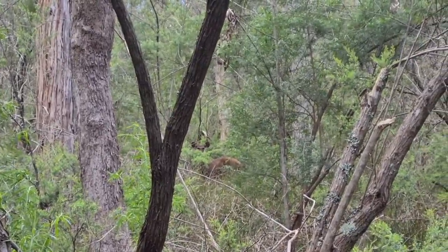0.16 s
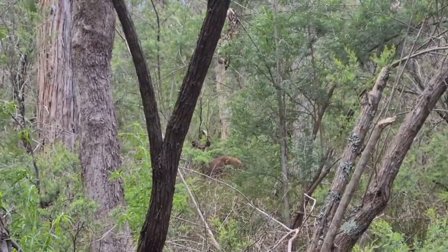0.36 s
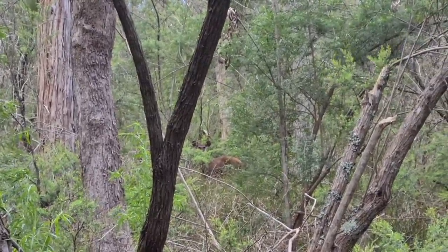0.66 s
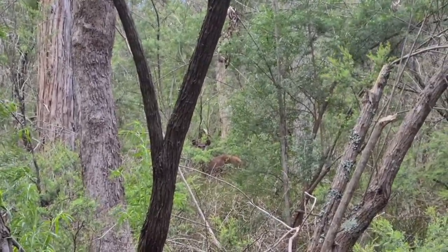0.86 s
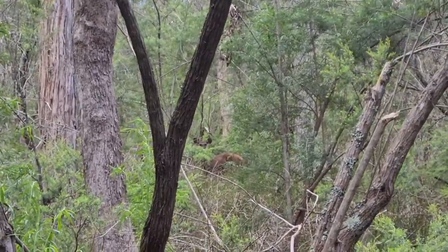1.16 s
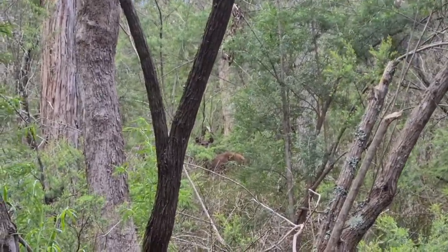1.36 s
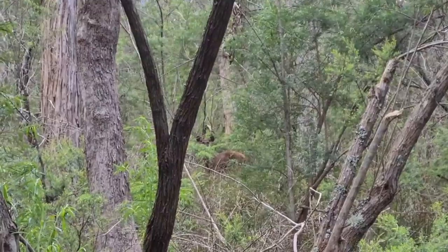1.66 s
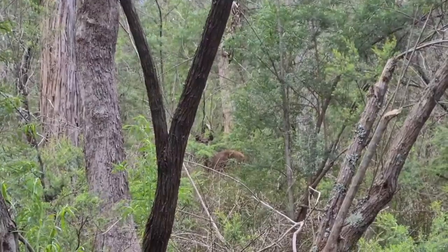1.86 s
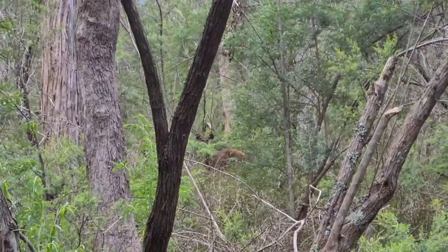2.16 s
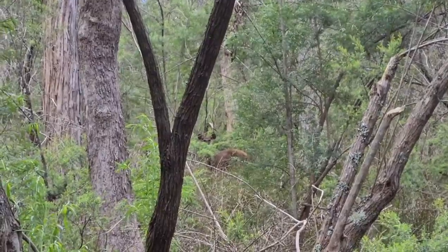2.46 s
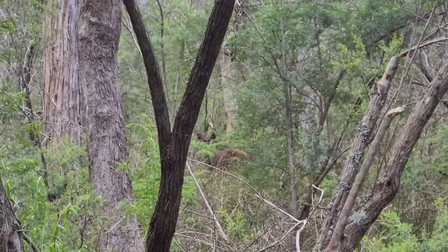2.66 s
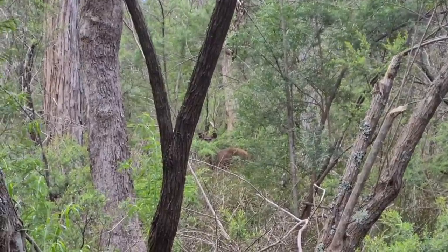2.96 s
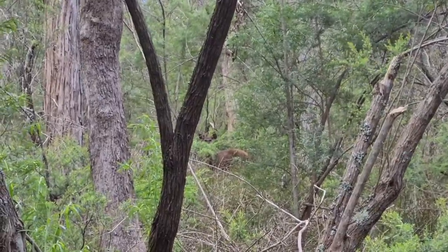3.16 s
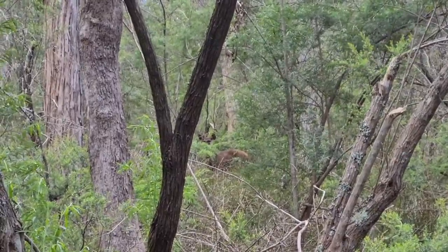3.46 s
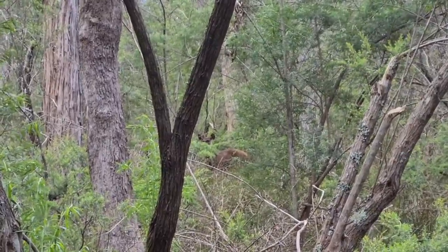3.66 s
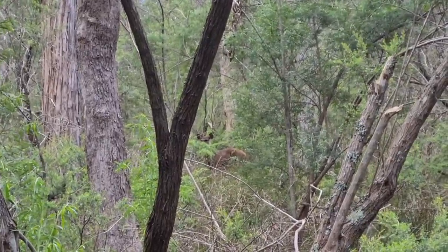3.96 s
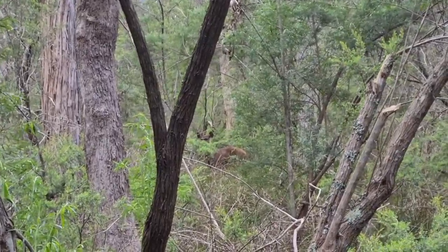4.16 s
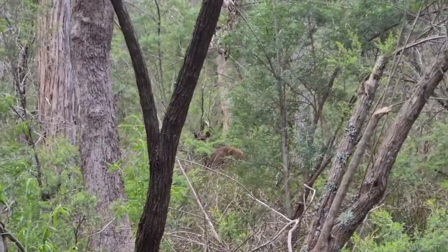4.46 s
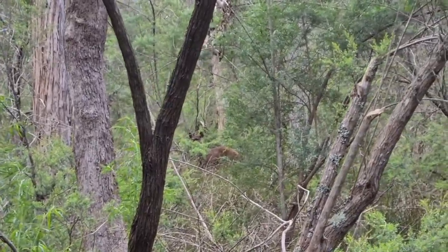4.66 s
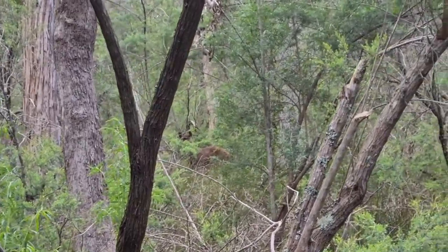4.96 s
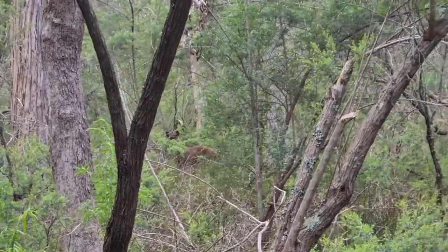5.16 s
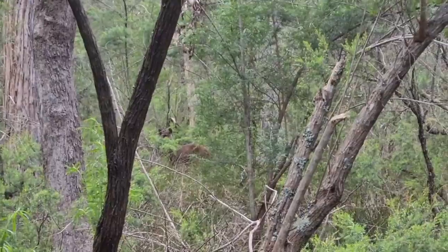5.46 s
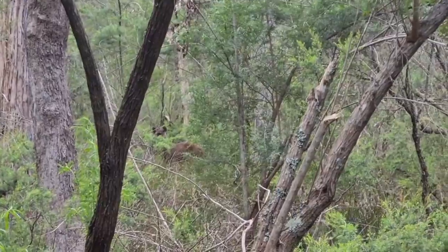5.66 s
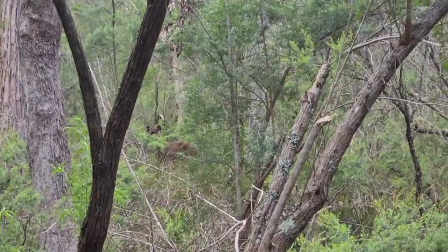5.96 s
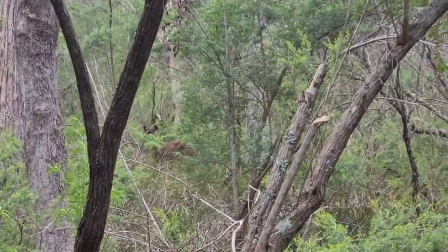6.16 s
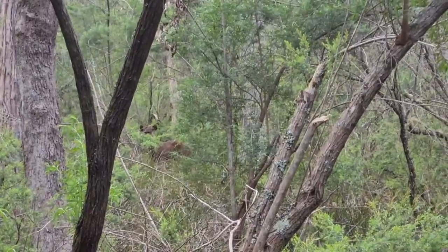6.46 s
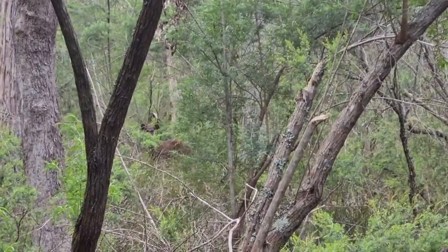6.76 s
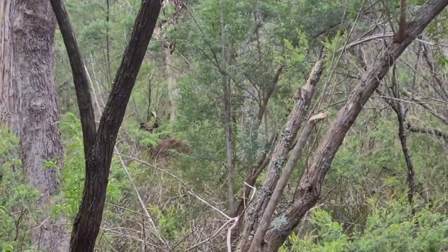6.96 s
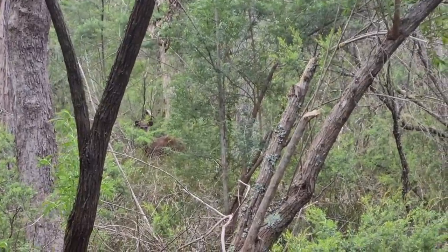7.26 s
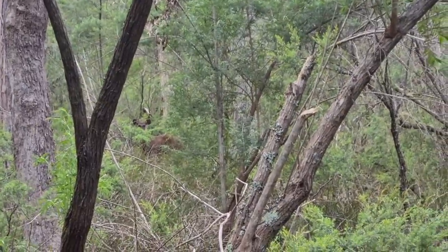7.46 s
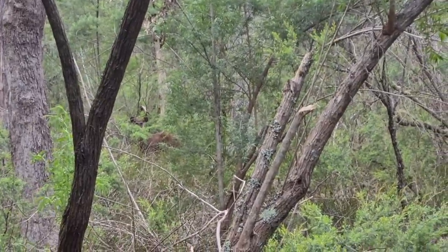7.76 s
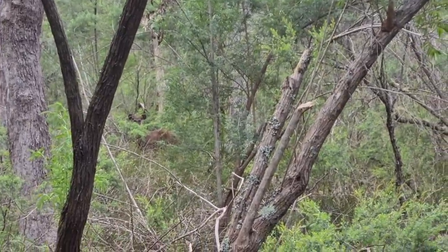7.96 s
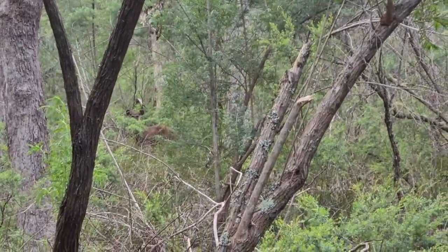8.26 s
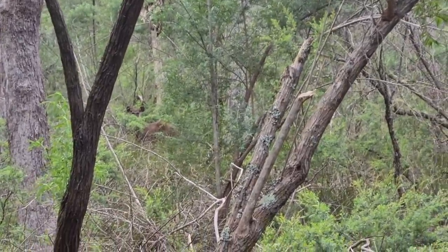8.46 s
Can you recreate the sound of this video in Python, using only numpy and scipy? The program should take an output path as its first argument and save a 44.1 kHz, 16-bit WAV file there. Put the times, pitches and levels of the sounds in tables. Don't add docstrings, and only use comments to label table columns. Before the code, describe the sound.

A near deer calls three times from the right: one bright, slightly raspy bleat early, then a cleaner one and a higher, longer one near the end. Each starts with a tiny leak of air, rises briefly and slides down. Between them a small bird twitters on the left, its notes scattered by trunks. Gentle wind and faint far birds surround them, caught by a stereo camera whose gain sinks and slowly recovers.

```python
import sys
import numpy as np
from scipy import signal
from scipy.fft import rfft, irfft, next_fast_len
from scipy.io import wavfile
from scipy.ndimage import uniform_filter1d, map_coordinates

SR = 44100
rng = np.random.default_rng(int(sys.argv[2]) if len(sys.argv) > 2 else 0)


def put_to_file(sound):
    columns = np.atleast_2d(sound).T
    safe = np.clip(columns, -1, 1)
    whole_steps = np.round(safe * 32767)
    wavfile.write(sys.argv[1], SR, whole_steps.astype(np.int16))


def volts(x):
    e = np.asarray(x, float) / 20
    return 10 ** e


N = 380141

# time_s, level_db
WIND_DB = [(0, -57), (.5, -57), (1.5, -58.5), (2.8, -58.5), (3.6, -56.5), (4.001, -57.5), (4.47, -55),
           (5.1, -57), (5.599, -56.5), (6.5, -57), (8.62, -58)]
# freq_hz, level_db_per_hz
RUMBLE_SPECTRUM = [(12, -42), (20, -16), (59, 8), (151, -3.5), (200, -10), (260, -34), (440, -120)]
CANOPY_SPECTRUM = [(90, -31.5), (130, -7.5), (430, -5), (650, -5.5), (900, -9), (1400, -8.5), (2400, -17),
                   (4000, -22.5), (6000, -43)]
LEAF_SPECTRUM = [(1500, -28), (3000, 0.5), (4400, -4), (6500, -2.5), (7300, -7), (9000, -16), (12000, -12),
                 (16000, -16.5)]
# freq_hz, correlation
LIKENESS = [(60, 0.53), (130, 0.86), (290, 0.96), (640, 0.37), (1410, -0.36), (3100, 0.7), (6820, -0.043),
            (15000, -0.01)]
# center_s, spread_s, level_db
GUSTS = [
    (0.1, .5, -60),
    (4.45, .2, -65),
    (5.6, 0.46, -55.5),
]

# start_s,
# length_s, middle_hz, peak_db
FAR_SLIDES = [(0.091, 0.027, 3090, -56), (0.278, 0.025, 3130, -56.5), (.48, 0.019, 3210, -59.5),
              (.67, .03, 2950, -60.5), (2.58, 0.015, 4110, -64), (3.068, 0.03, 3450, -57.5),
              (4.815, .018, 4400, -63), (4.949, .015, 4420, -60.5), (5.069, 0.02, 4140, -54.5),
              (5.265, 0.03, 2820, -51), (5.72, .04, 2430, -59)]
FAR_PIPS = [(.14, 0.011, 2550, -55), (.335, .018, 2520, -59.5), (0.356, .015, 5150, -65),
            (2.975, .02, 3780, -60), (2.99, .014, 4250, -65), (5.709, .03, 2200, -62),
            (5.935, 0.077, 3536, -59.5), (6.035, .04, 4450, -67.5)]
FAR_RISES = [(.975, 0.024, 6270, -61.5), (3.22, 0.018, 3270, -63), (5.869, 0.041, 2500, -56.5),
             (6.07, .02, 1950, -62.5)]
FAR_SWEEPS = [(2.525, .024, 3285, -66), (2.64, .03, 3160, -61.5), (2.78, 0.024, 3200, -59),
              (2.93, 0.031, 3000, -58), (3.27, 0.028, 3070, -58), (5.095, 0.05, 2970, -51),
              (5.41, 0.016, 2770, -50), (5.55, 0.026, 2550, -51.5), (5.69, 0.03, 2980, -53),
              (6.04, .03, 2250, -57.5)]
FAR_CROOKS = [(5.249, 0.036, 3000, -52), (5.385, 0.029, 3755, -53.5), (5.67, .03, 3650, -55),
              (5.71, 0.033, 3610, -57), (5.895, 0.036, 2800, -51), (6.015, 0.027, 2964, -49),
              (6.045, 0.024, 2950, -61.5), (6.085, 0.029, 2230, -58.5)]

# catch_s, lead_hz, lead_db, leak_db, rasp_db_per_octave
ONSETS = [
    (1.0745, 1083, -34.5, -46, 2),
    (6.2585, 1132, -36.5, -47.5, 0),
    (7.3579, 1392, -48.5, -52.5, -1),
]
# time_from_catch_s, level_db
AIR_LEAK = [
    (-.135, -27.5),
    (-.095, -24.5),
    (-.085, -9.5),
    (-.01, 2.5),
]
# time_s, pitch_hz
PITCH_HZ = [
    [(1.083, 1326), (1.132, 1413), (1.2, 1646), (1.242, 1673), (1.32, 1492), (1.465, 1382), (1.548, 1147),
     (1.6, 1036), (1.74, 582)],
    [(6.266, 1384), (6.314, 1457), (6.374, 1657), (6.42, 1664), (6.535, 1430), (6.63, 1366), (6.705, 1185),
     (6.754, 895), (6.845, 566)],
    [(7.365, 1594), (7.4, 1603), (7.49, 1729), (7.578, 1714), (7.722, 1537), (7.785, 1496), (7.968, 1114),
     (8.084, 778.6), (8.125, 597)],
]
# time_s, level_db
EFFORT_DB = [
    [(1.077, -11), (1.113, -9.5), (1.229, -17), (1.301, -13.5), (1.327, -15.5), (1.447, -11), (1.647, -17),
     (1.695, -29.5), (1.785, -63)],
    [(6.263, -10.5), (6.329, -9.5), (6.373, -13), (6.44, -12.5), (6.505, -10.5), (6.683, -22.5),
     (6.757, -19.5), (6.799, -23), (6.89, -60.5)],
    [(7.361, -14), (7.381, -12), (7.781, -11), (7.871, -19.5), (7.92, -20), (7.983, -23), (7.999, -17),
     (8.091, -27), (8.165, -65)],
]
# harmonic_number, level_db
FOLDS_DB = [(1, -7), (2, 0.64), (3, -8), (4, -8), (5, -12.5), (6, -13.5), (7, -14), (8, -24.5), (9, -13),
            (10, -18), (12, -18), (14, -28.5), (30, -23)]
# freq_hz, gain_db
THROAT_DB = [(550, -47.5), (800, -25), (1200, -16), (1650, -11), (2250, -12), (2600, -5.5), (2950, 0.8),
             (3300, -3), (4050, -12), (4900, -9), (7000, -11.5), (8900, -26), (11000, -12.5), (15500, -8.5)]
# freq_hz, level_db_per_hz
BREATH_SPECTRUM = [(200, -17.5), (400, -15), (800, -10), (1200, -9.5), (2000, -11.5), (3000, -1.5),
                   (4500, -12.5), (7000, -5), (8800, -20), (12000, -11), (15500, -4)]
# center_s, spread_s, level_db
PUFFS = [
    (1.74, .04, -51),
    (6.82, .04, -46),
    (8.11, 0.055, -53.5),
]
# freq_hz, gain_db
FAR_EAR_DB = [(60, 1.5), (110, 0.5), (200, -1.0), (380, -2.0), (700, -4.0), (1290, -10.5), (2380, -13.5),
              (4400, -10), (8120, -11.5), (15000, -17.5)]
# delay_ms, left_db, right_db
NEAR_ECHOES = [(1.05, -21, -16), (1.9, -17, -18), (3.3, -16.5, -23), (6.1, -18.5, -21.5)]

# start_s, length_s, middle_hz, peak_db
NEAR_ARCHES = [(2.726, 0.017, 5870, -51), (3.076, .018, 7270, -53), (3.076, 0.034, 6120, -45),
               (3.292, 0.025, 5650, -39), (3.431, 0.02, 7170, -48.5), (3.431, 0.026, 5920, -42),
               (3.786, 0.032, 5990, -40.5), (4.015, 0.032, 5670, -39), (4.169, 0.035, 6020, -42),
               (4.252, 0.027, 5730, -38), (4.256, 0.027, 7100, -51.5)]
NEAR_HOOKS = [(2.822, 0.023, 5000, -44.5), (3.153, 0.018, 5770, -26), (3.356, 0.018, 5195, -27.5),
              (3.508, 0.016, 5910, -29.5), (3.715, 0.013, 5110, -27.5), (3.875, 0.02, 6040, -27.5),
              (4.08, 0.019, 4970, -28)]
NEAR_HOLDS = [(2.871, 0.033, 5920, -39.5), (3.21, 0.023, 6460, -38), (3.563, .01, 7690, -52),
              (4.118, 0.022, 6680, -41.5), (4.324, 0.13, 6520, -38.5), (4.47, 0.093, 5092, -30.5)]
NEAR_DROOPS = [(3.09, 0.026, 4550, -56), (3.445, .028, 4270, -56.5), (3.806, .03, 4400, -57),
               (4.185, 0.029, 4420, -53)]
NEAR_FALLS = [(3.193, 0.028, 6830, -38.5), (3.379, .014, 5570, -31), (3.623, 0.016, 5610, -26.5),
              (3.658, 0.01, 6930, -36), (3.744, 0.0139, 5660, -30.5), (3.928, .03, 6740, -36)]

HOOK, FALL, HOLD, ARCH, DROOP = (1.045, 1.015), (1.03, .982), (1.011, .996), (.925, .97), (1.0, .92)
SWEEP, SLIDE, RISE = (1.22, .72), (1.06, .86), (.85, 1.15)
OVERTONE_DB = -39

DUCK_DB, DUCK_S, RECOVER_S = -7.5, .15, 1.3
RUMBLE_DB, RUMBLE_GROWTH, LULL_DB = -6, 1, 0.5
HISS_DB, TOP_HZ = -83.5, 15900

LEAD_S, LEAD_RISE_RATIO, JUMP_S = .028, 0.045, .003
SAG_HZ_PER_S, WAVER_RATIO_PER_OCT = 510, .006
BRIGHT_DB, FIRST_DB = 0, -0.5
BLOOM_DB, BLOOM_S = -8, 0.088
ECHO_S, ECHO_DB = .14, -35
HOP_S, LAG_BEFORE_SAMPLES, LAG_AFTER_SAMPLES = 4.31, 20.86, 18.8


def along(points, hz):
    f, v = np.transpose(points)
    return np.interp(np.log(hz + 1), np.log(f + 1), v)


def unit(x):
    return x / np.sqrt(np.mean(x ** 2) + 1e-20)


def filtered(x, response):
    m = next_fast_len(N + 8192)
    return irfft(rfft(x, m) * response(np.fft.rfftfreq(m, 1 / SR)), m)[..., :N]


def colored(spectrum):
    return unit(filtered(rng.standard_normal(N), lambda hz: volts(along(spectrum, hz))))


def wobble(rate_hz, count):
    knots = rng.standard_normal(int(N * 300 / SR) + 4)
    return map_coordinates(knots, [np.arange(count) * rate_hz / SR])


def swells(table):
    t = np.arange(N) / SR
    return sum(volts(db) * np.exp(-((t - at) / spread) ** 2) for at, spread, db in table)


def ports(x, lag, left_db):
    left = filtered(x, lambda hz: volts(left_db(hz)) * np.exp(-2j * np.pi * hz * lag / SR))
    return np.array([left, x])


def trunks(x, t60_s, wet_db):
    t = np.arange(SR) / SR
    tail = rng.standard_normal((2, SR)) * volts(-60 * t / t60_s) * (1 - np.exp(-t / (0.11 * t60_s)))
    tail = tail / np.linalg.norm(tail[0])
    return volts(wet_db) * signal.fftconvolve(x[None], tail, axes=1)[:, :N]


def ducking():
    t = np.arange(N) / SR
    dips = []
    for effort in EFFORT_DB:
        sink = 1 - np.exp(-np.maximum(t - effort[0][0], 0) / DUCK_S)
        recover = np.exp(-np.maximum(t - effort[-1][0], 0) / RECOVER_S)
        dips.append(sink * recover)
    return DUCK_DB * np.max(dips, axis=0)


def rush(spectrum, alike, patchy_db):
    z = signal.stft(rng.standard_normal((2, N)), nperseg=512)[2]
    field = uniform_filter1d(rng.standard_normal(z.shape[1:]), size=6, axis=0)
    field = uniform_filter1d(field, size=14, axis=1)
    pair = signal.istft(z * volts(patchy_db * unit(field)), nperseg=512)[1][:, :N]

    def mid_side(hz):
        turn = np.arccos(np.clip(along(alike, hz), -1, 1)) / 2
        return volts(along(spectrum, hz)) * np.array([np.cos(turn), np.sin(turn)])

    mid, side = filtered(pair, mid_side)
    return unit(np.array([mid + side, mid - side]))


def bush():
    wind_db = np.interp(np.arange(N) / SR, *np.transpose(WIND_DB))
    canopy_db = wind_db + ducking()
    rumble_db = canopy_db + RUMBLE_DB + (RUMBLE_GROWTH - 1) * (wind_db - wind_db.mean())
    rumble_db = rumble_db + LULL_DB * wobble(2.5, N) + 4.0 + 1.5 * wobble(6, N)
    rumble = volts(rumble_db) * rush(RUMBLE_SPECTRUM, [(30, .35), (80, .45), (150, 0.49)], patchy_db=0.5)
    canopy = volts(canopy_db + 4.0 + .6 * wobble(5, N)) * rush(CANOPY_SPECTRUM, LIKENESS, patchy_db=1.15)
    leaves = volts(canopy_db - 6.0) * rush(LEAF_SPECTRUM, LIKENESS, patchy_db=1.36)
    gust_spectrum = [(800, -34), (1100, -4), (1350, 1.65), (1700, -10), (2300, -36.5)]
    gusts = swells(GUSTS) * rush(gust_spectrum, LIKENESS, patchy_db=0.5)
    return rumble + canopy + leaves + gusts


def whistles(table, shape):
    out = np.zeros(N)
    for start_s, length_s, hz, db in table:
        u = np.linspace(0, 1, round(1.45 * length_s * SR))
        curve = np.polyfit([.15, .5, .85], [shape[0], 1, shape[1]], 2)
        phase = 2 * np.pi * np.cumsum(hz * np.polyval(curve, u)) / SR
        swell = np.sin(np.pi * u ** (.95 - 2.5 * length_s)) ** 1.2
        tone = np.sin(phase) + volts(OVERTONE_DB) * np.sin(3 * phase)
        out[round((start_s - .12 * length_s) * SR):][:len(u)] += volts(db) * swell * tone
    return out


def far_birds():
    song = whistles(FAR_SLIDES, SLIDE) + whistles(FAR_PIPS, HOLD) + whistles(FAR_RISES, RISE)
    song = song + whistles(FAR_SWEEPS, SWEEP) + whistles(FAR_CROOKS, ARCH)
    song = volts(8.0) * song
    return ports(song, lag=9.4, left_db=lambda hz: -5.5) + trunks(song, .6, -7) + trunks(song, .09, -5)


def fold_pitch(t, pitch, catch_s, lead_hz):
    aim = np.interp(t, *np.transpose(pitch)) - SAG_HZ_PER_S * np.maximum(t - pitch[-1][0], 0)
    flutter = 0.00061 * wobble(70, len(t)) * (1700 / aim)
    waver = WAVER_RATIO_PER_OCT * wobble(28, len(t)) * np.log2(1750 / aim)
    voiced_hz = uniform_filter1d(aim, size=1100, mode="nearest") * (1 + flutter + waver)
    jump = 1 / (1 + np.exp((catch_s - .8 * JUMP_S - t) / JUMP_S))
    return jump * voiced_hz + (1 - jump) * lead_hz * (1 + LEAD_RISE_RATIO * (t - t[0]) / LEAD_S)


def fold_tone(t, hz, effort_db, catch_s, caught, rasp_db):
    k = np.arange(1, 30)[:, None]
    fall_oct = np.log2(1700 / hz)
    tilt_db = (k == 1) * FIRST_DB + np.log2(np.maximum(k / 2, 1)) * (BRIGHT_DB + 0.75 * rasp_db)
    bloom = np.exp(-np.maximum(t - catch_s, 0) / BLOOM_S)
    shape_db = along(FOLDS_DB, k) + along(THROAT_DB, k * hz) + tilt_db * (fall_oct - .4)
    shape_db = shape_db + (k - 1) * 1.2 * np.minimum(effort_db + 30.5, 0)
    shape_db = shape_db + np.log2(np.maximum(k / 3, 1)) * BLOOM_DB * bloom
    shimmer = np.array([wobble(90, len(t)) for _ in k])
    shimmer_db = .17 * (1700 / hz) ** 2.2 * np.sqrt(k) * shimmer
    size = volts(shape_db + shimmer_db) * np.where(k == 1, 1, caught) * (k * hz < 17000)
    size = size / np.sqrt((size ** 2).sum(0) / 2)
    phase = 2 * np.pi * np.cumsum(hz) / SR
    return (size * np.sin(k * phase + .4 * k ** 2)).sum(0)


def deer():
    voice, flow, now = np.zeros(N), np.zeros(N), np.arange(N) / SR
    for effort, pitch, (catch_s, lead_hz, lead_db, leak_db, rasp_db) in zip(EFFORT_DB, PITCH_HZ, ONSETS):
        at = slice(round((catch_s - LEAD_S) * SR), round(effort[-1][0] * SR))
        t = now[at]
        lead = [(t[0], lead_db - 3.5), (catch_s - .012, lead_db)]
        db = np.interp(t, *np.transpose(lead + effort))
        hz = fold_pitch(t, pitch, catch_s, lead_hz)
        caught = 1 / (1 + np.exp((catch_s - t) / 0.00032))
        tone = fold_tone(t, hz, db, catch_s, caught, rasp_db)
        voice[at] = tone * volts(db + 5.0 - 7.3 * (1 - caught)) * signal.windows.tukey(len(t), .03)
        slack_db = (14.5 + rasp_db) * np.log2(1700 / hz)
        flow[at] = caught * volts(-36.5 + 0.54 * db + .6 * np.minimum(db + 29.5, 0) + slack_db)
        swell_db = np.interp(now - catch_s, *np.transpose(AIR_LEAK), left=-90)
        flow += volts(swell_db + leak_db + 11.5) * (now < catch_s)
    puff = colored([(120, -36), (250, -4), (380, 0.2), (550, -12.0), (900, -31.5)])
    call = voice + flow * colored(BREATH_SPECTRUM) + swells(PUFFS) * puff
    direct = ports(call, lag=-3.5, left_db=lambda hz: along(FAR_EAR_DB, np.maximum(hz, 1300)))

    def comb(hz):
        treble = hz / (hz + 3000)
        return 1 + sum(volts([[left_db], [right_db]]) * np.exp(-2j * np.pi * hz * ms / 1000) * treble
                       for ms, left_db, right_db in NEAR_ECHOES)

    return filtered(direct, comb) + trunks(call, ECHO_S, ECHO_DB)


def near_bird():
    song = whistles(NEAR_ARCHES, ARCH) + whistles(NEAR_HOOKS, HOOK) + whistles(NEAR_HOLDS, HOLD)
    song = song + whistles(NEAR_DROOPS, DROOP) + whistles(NEAR_FALLS, FALL)
    song = volts(-3.0) * song
    moved = np.arange(N) / SR > HOP_S
    direct = ports(song * ~moved, LAG_BEFORE_SAMPLES, lambda hz: 1.5)
    direct = direct + ports(song * moved, LAG_AFTER_SAMPLES, lambda hz: 2.5)
    return direct + trunks(song, 0.412, -7.5) + trunks(song, 0.048, -17)


def scene():
    return bush() + far_birds() + deer() + near_bird()


def roll_off(x):
    return signal.sosfilt(signal.butter(12, 15890, fs=SR, output="sos"), x)


def record(dry):
    hissy = dry + volts(HISS_DB) * rng.standard_normal(dry.shape)
    mix = filtered(np.clip(hissy, -1, 1), lambda hz: hz < TOP_HZ)
    return roll_off(mix)


dry = scene()
out = record(dry)
put_to_file(out)
```